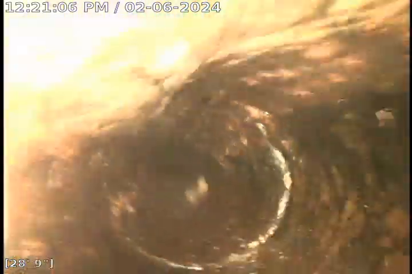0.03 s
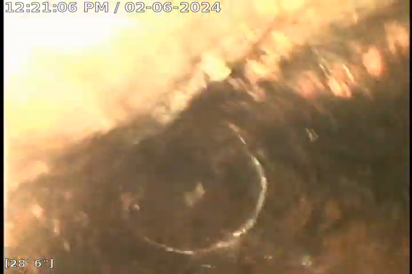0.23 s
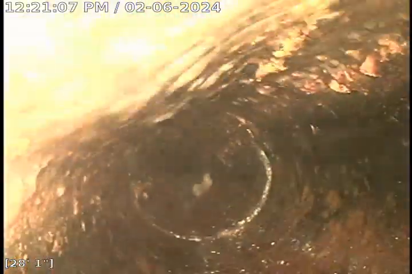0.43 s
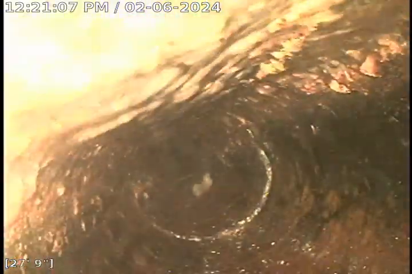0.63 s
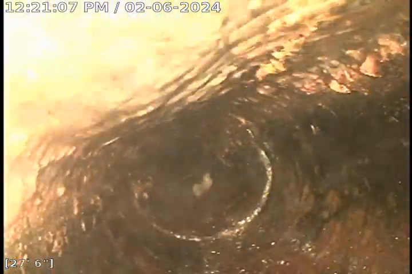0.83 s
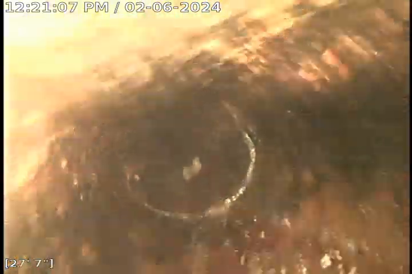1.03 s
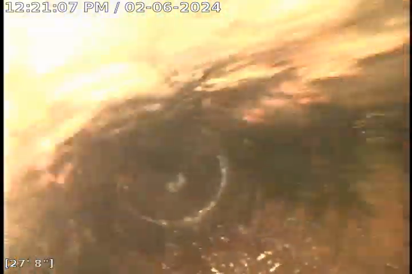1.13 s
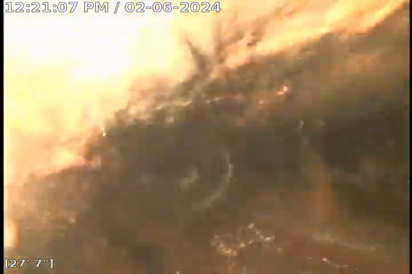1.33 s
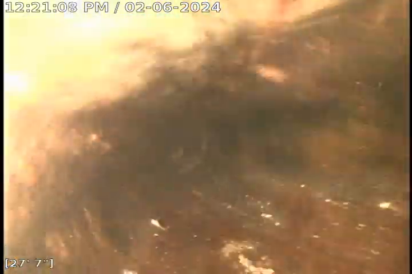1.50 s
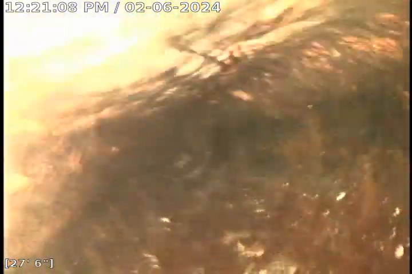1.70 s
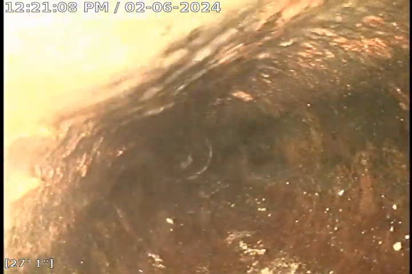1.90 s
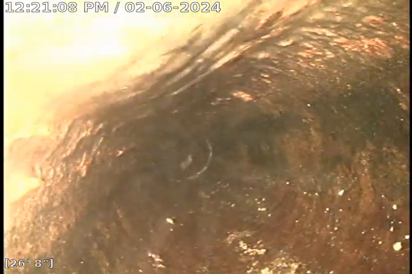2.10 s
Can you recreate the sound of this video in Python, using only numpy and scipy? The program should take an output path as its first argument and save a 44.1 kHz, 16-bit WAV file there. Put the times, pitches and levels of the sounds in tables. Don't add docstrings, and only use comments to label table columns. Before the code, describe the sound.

A stiff cable cracks hard against a drain pipe almost at once, at 0.01 seconds, with a short hollow boom and hard-room tail. Quiet rubbing, tiny squeaks and soft low bumps follow, one clearer near 0.78. A dull rattle and light click come at 1.06-1.12, a short skid into a sharper crack with rebound at 1.45, then faint bumps, scuffing and a weak knock near 2.0, over low hum and hiss.

```python
import sys
import numpy as np
from scipy import signal
from scipy.fft import rfft, irfft, next_fast_len
from scipy.io import wavfile
from scipy.ndimage import uniform_filter1d, map_coordinates

SR = 44100
rng = np.random.default_rng(int(sys.argv[2]) if len(sys.argv) > 2 else 0)


def output_pcm(signal):
    pcm = np.clip(np.atleast_2d(signal).T, -1, 1) * 32767
    wavfile.write(sys.argv[1], SR, np.round(pcm).astype(np.int16))


def convert_level_to_amplitude(level_db):
    exponent = np.asarray(level_db, float) / 20
    return 10 ** exponent


N = 94859

# start in seconds, crack level in dB, clack level in dB, rattle length in seconds,
# top of the crack in Hz.
SNAPS = [
    (0.0143, -3.5, -16.5, 0.0038, 14900),
    (1.057, -35.5, -36.5, 0.0092, 3200),
    (1.1236, -26.5, -31.5, 0.0065, 6800),
    (1.4512, -17.5, -27.5, 0.0018, 12300),
    (1.4575, -29, -34.5, 0.005, 7200),
    (1.491, -40, -35, 0.012, 4370),
    (2.016, -47, -37.5, .01, 3960),
    (1.529, -42, -37.5, 0.02, 2980),
]
# frequency in Hz, level in dB.
CRACK_SPECTRUM = [(1300, -12), (1620, -17.5), (1900, -9), (2400, -9), (3200, -8), (4500, -8), (8000, -12),
                  (15000, -23.5)]
# frequency in Hz, level in dB, T60 in seconds.
RIM_MODES = [(2930, 0, .03), (3430, -1, .035), (4150, -6, .016), (5500, -10, .012)]
# frequency in Hz, width in Hz, level in dB.
WALL_RESONANCES = [(300, 180, -3.5), (435, 133, 2), (702, 130, 3), (910, 150, -3.5), (1032, 134, -0.5),
                   (1270, 67, -22)]
# frequency in Hz, level in dB, T60 in seconds.
PIPE_MODES = [(165, -16, 0.17), (247.4, -5, 0.17), (263.2, -1.5, 0.077), (350, -12, 0.11), (443, -18, 0.2),
              (721, -12.5, 0.081), (922, -18.5, 0.14), (1276, -25, 0.18)]
# start in seconds, end in seconds, end level in dB, rise in dB, top in Hz.
SKIDS = [
    (0.003, 0.015, -28, 14, 2900),
    (1.416, 1.452, -25.5, 20.5, 5300),
    (1.035, 1.058, -38, 19, 4000),
    (1.99, 2.06, -46.5, 1, 1100),
    (1.36, 1.43, -43.5, 13, 960),
]
# start in seconds, level in dB, hold in seconds, pitch in Hz.
TONES = [(.0195, -14, 0.0038, 3435), (.016, -9, .0015, 3050), (.017, -18, 0.0073, 3610),
         (.019, -17.5, 0.011, 665), (0.016, -24.5, 0.013, 1026), (0.016, -23, 0.017, 1362),
         (1.056, -45, .01, 1210), (1.057, -49, 0.009, 2500), (1.1245, -31, 0.011, 692),
         (1.13, -30.5, 0.011, 448), (1.125, -43, 0.0056, 940), (1.126, -38, .004, 3390),
         (1.452, -22.5, 0.00078, 3200), (1.4518, -26, 0.0027, 4600), (1.4525, -26.5, 0.0085, 1113),
         (1.453, -30, .009, 722), (1.4635, -35, 0.0027, 6200), (2.2, -45, .012, 1200),
         (2.5, -47, .015, 690), (.242, -50, .012, 7300), (1.46, -31.5, 0.021, 205),
         (1.434, -35.5, 0.012, 482), (1.545, -39.5, 0.022, 440), (1.505, -45, .02, 1110),
         (1.4, -41, .02, 442), (0.95, -48, .012, 2770)]
# start in seconds, level in dB, push length in seconds, pitch in Hz.
BUMPS = [(0.111, -32.5, 0.042, 263.4), (0.165, -40, 0.03, 256), (0.245, -46.5, 0.023, 414),
         (0.299, -42, 0.027, 270), (0.363, -38, 0.012, 270), (0.389, -38.5, 0.02, 270),
         (.52, -48.5, 0.02, 426), (.6, -47, .02, 190), (0.642, -39, 0.0093, 262), (0.715, -45, 0.058, 270),
         (0.775, -29.5, 0.0041, 211), (0.787, -35.5, 0.023, 267), (0.818, -48, 0.026, 430),
         (1.065, -33.5, 0.021, 273.4), (1.061, -37.5, 0.035, 431), (1.132, -29, 0.014, 324),
         (1.456, -23.5, 0.011, 453), (1.136, -34, 0.026, 174.5), (1.221, -35, 0.018, 257),
         (1.263, -44, 0.025, 187), (1.521, -36.5, 0.031, 432.6), (1.542, -36.5, 0.031, 249),
         (1.619, -45.5, 0.044, 264), (1.721, -41.5, 0.025, 253), (1.771, -42, 0.016, 270),
         (1.824, -48, 0.046, 271), (1.962, -43, 0.011, 280), (1.996, -43, 0.024, 300),
         (2.015, -34.5, 0.012, 320), (2.041, -40, 0.0084, 240), (2.11, -39.5, 0.0096, 238)]
# time in seconds, level in dB, brightness in dB.
DRAG = [(0, -47.5, -17), (.22, -53, 7), (.25, -47, -1.5), (.32, -50.5, 1.5), (0.358, -44.5, 5.5),
        (.55, -48.5, 9), (.6, -51.5, 1), (.72, -51, 9), (0.898, -50.5, 10), (0.942, -61, 7), (1.0, -47, -1),
        (1.15, -48, -3), (1.35, -52.5, 4), (1.5, -54, 6.5), (1.8, -48, -1), (1.87, -46, 9),
        (2.08, -45.5, 6), (2.13, -50, -1)]
# frequency in Hz, density in dB per Hz.
RUB_SPECTRUM = [(290, -55), (500, -19), (603, -4.5), (666, -4), (1250, -2.5), (1370, -7), (3580, -3),
                (13800, -22), (15500, -22)]
# start in seconds, length in seconds, level in dB, start pitch in Hz, end pitch in Hz.
SQUEAKS = [
    (0.227, 0.075, -51.5, 3900, 4360),
    (0.359, 0.042, -50.5, 4200, 4110),
    (0.714, 0.23, -53, 4700, 4500),
    (0.758, 0.15, -53.5, 2090, 2570),
    (0.986, 0.061, -52.5, 2400, 2760),
    (1.838, 0.088, -45.5, 3800, 3510),
]
# frequency in Hz, T60 in seconds.
ROOM_T60 = [(200, 0.46), (1000, 0.47), (4000, 0.25), (12000, 0.2)]
# frequency in Hz, density in dB per Hz.
HISS_SPECTRUM = [(18, -39), (30, -24), (41, -41), (55, -31), (270, -24), (432, 3.5), (518, -10),
                 (5590, -14), (15500, -38)]
# frequency in Hz, width in Hz, level in dB.
AIR_RESONANCES = [(169, 31, -4), (198.4, 18.6, -0.5), (270, 27, 0), (334.4, 35, -7), (422, 44, -6.5),
                  (670, 77, -15.5)]
APART_S = [.02, .045, .235, .275, .53, .675, .99, 1.12, 1.145, 1.445, 1.79, 1.93, 2.09]
CHANNEL_OFFSET = [
    [.0188],
    [.0046],
]

CRACK_RISE_S, CRACK_T60_S, RIM_DB = .0005, .035, 1
CLACK_RISE_S, CLACK_HOLD_S, CLACK_T60_S = .0026, .0092, .053
CLACK_TOP_SHARE = .15
ROOM_CRACK_DB, ROOM_CLACK_DB, ROOM_RISE_S = -9.5, -6.5, .00092
BOOM_DB, BOOM_DELAY_S, BOOM_RISE_S = 2, .0017, .0063
TONE_RISE_CYCLES, TONE_T60_S, TONE_ROUGH_SHARE = 1.5, .03, .3
BUMP_RISE_S, BUMP_T60_S, BUMP_PUFF_DB, BUMP_TOP_HZ = .005, .045, -6.5, 476
GRAINS_PER_S, GRAIN_SPREAD_DB, GRAIN_SHARE, RUB_FLUTTER_DB = 3000, 2.5, .4, .8
SQUEAK_WIDTH_HZ, SQUEAK_EDGE_POWER = 900, .5
HISS_DB, HUM_DB, HUM_FLUTTER_DB = -52.5, -49.5, 1.8
HUM_DB_PER_DRAG_DB = .51
LOW_CUT_HZ, TOP_HZ, SELF_NOISE_DB = 142, 15790, -64
APART_LENGTH_S, APART_DB, APART_CEILING_DB = .022, -5.5, -47
DRIFT_DB, STRAY_DB, STRAY_PATCHY_DB = -62, -68.5, 7


def unit(x):
    return x / np.sqrt(np.mean(x ** 2) + 1e-20)


def along(points, hz):
    f, v = np.transpose(points)
    return np.interp(np.log(hz + 1), np.log(f + 1), v)


def wobble(knots_per_s):
    knots = rng.standard_normal(int(N * knots_per_s / SR) + 4)
    return map_coordinates(knots, [np.arange(N) * knots_per_s / SR])


def filtered(x, response):
    n = x.shape[-1]
    m = next_fast_len(n + 8192)
    return irfft(rfft(x, m) * response(np.fft.rfftfreq(m, 1 / SR)), m)[..., :n]


def noise(n, response):
    return unit(filtered(rng.standard_normal(n), response))


def low_pass(f, top_hz, order=4):
    return 1 / (1 + (f / top_hz) ** order)


def peak(f, centre_hz, width_hz):
    return 1j * f * width_hz / (centre_hz * centre_hz - f * f + 1j * f * width_hz)


def rise(t, length_s):
    return np.clip(t / length_s, 0, 1)


def fade(t, hold_s, t60_s):
    return convert_level_to_amplitude(-60 * np.clip(t - hold_s, 0, None) / t60_s)


def ring(modes, t, t60_scale, scatter_db):
    out = np.zeros(len(t))
    for hz, db, t60_s in modes:
        a, b = rng.standard_normal(2)
        decay = convert_level_to_amplitude(db + scatter_db * a - 60 * t / (t60_scale * min(t60_s, .3)))
        out += decay * np.sin(2 * np.pi * hz * (1 + .0049 * scatter_db * b) * t)
    return out


def add(track, start_s, sound):
    track[round(start_s * SR):][:len(sound)] += sound


def snaps():
    out, t = np.zeros(N + SR), np.arange(SR // 2) / SR
    for s, crack_db, clack_db, length_s, top_hz in SNAPS:
        def sharp(f):
            return convert_level_to_amplitude(along(CRACK_SPECTRUM, f)) * low_pass(f, top_hz)

        def wall(f):
            body = sum(convert_level_to_amplitude(db) * peak(f, c, w) for c, w, db in WALL_RESONANCES)
            return body * low_pass(f, CLACK_TOP_SHARE * top_hz)

        crack = noise(len(t), sharp) * rise(t, CRACK_RISE_S) * fade(t, length_s, CRACK_T60_S)
        crack += convert_level_to_amplitude(RIM_DB) * ring(RIM_MODES, t, .67, 1.3) * rise(t, length_s / 3)
        clack = noise(len(t), wall) * rise(t, CLACK_RISE_S) * fade(t, CLACK_HOLD_S, CLACK_T60_S)
        add(out, s, convert_level_to_amplitude(crack_db - 4.5) * (crack + convert_level_to_amplitude(ROOM_CRACK_DB) * room(sharp)))
        add(out, s, convert_level_to_amplitude(clack_db) * (clack + convert_level_to_amplitude(ROOM_CLACK_DB) * room(wall)))
    return out[:N]


def boom():
    out, t = np.zeros(N + SR), np.arange(SR // 2) / SR
    swell = 1 - np.exp(-t / BOOM_RISE_S)
    add(out, SNAPS[0][0] + BOOM_DELAY_S, convert_level_to_amplitude(BOOM_DB) * ring(PIPE_MODES, t, 1.0, 0) * swell)
    return out[:N]


def skids():
    out, t = np.zeros(N + SR), np.arange(SR // 2) / SR
    for start_s, end_s, db, rise_db, top_hz in SKIDS:
        scrape = noise(len(t), lambda f: f / (f + 250) * low_pass(f, top_hz) / (f + 600) ** .89)
        length_s = end_s - start_s
        swell = convert_level_to_amplitude(db - rise_db * (1 - rise(t, length_s))) * (t < length_s)
        add(out, start_s, swell * scrape)
    return out[:N]


def tones():
    out, t = np.zeros(N + SR), np.arange(SR // 8) / SR
    for s, db, hold_s, hz in TONES:
        rough = 1 + TONE_ROUGH_SHARE * unit(uniform_filter1d(rng.standard_normal(len(t)), size=150))
        shape = rise(t, TONE_RISE_CYCLES / hz) * fade(t, hold_s, TONE_T60_S)
        add(out, s, convert_level_to_amplitude(db) * shape * rough * np.sin(2 * np.pi * hz * t))
    return out[:N]


def bumps():
    out, t = np.zeros(N + SR), np.arange(SR // 4) / SR

    def body(f):
        return sum(peak(f, hz, 85) ** 2 for hz, _, _ in PIPE_MODES) * low_pass(f, BUMP_TOP_HZ, 2)

    for s, db, length_s, hz in BUMPS:
        shape = np.sin(np.pi / 2 * rise(t, BUMP_RISE_S)) ** 2 * fade(t, length_s, BUMP_T60_S)
        puff = convert_level_to_amplitude(BUMP_PUFF_DB) * noise(len(t), body)
        add(out, s, convert_level_to_amplitude(db) * shape * (np.sin(2 * np.pi * hz * t) + puff))
    return out[:N]


def rubbing():
    s, db, bright_db = np.transpose(DRAG)
    t = np.arange(N) / SR
    hits = rng.random(N) < GRAINS_PER_S / SR
    grit = hits * convert_level_to_amplitude(GRAIN_SPREAD_DB * rng.exponential(size=N)) * rng.standard_normal(N)
    source = rng.standard_normal(N) + GRAIN_SHARE * unit(grit)
    rub = unit(filtered(source, lambda f: convert_level_to_amplitude(along(RUB_SPECTRUM, f))))
    top = filtered(rub, lambda f: 1 / (1 + (6500 / (f + 1)) ** 4))
    level = convert_level_to_amplitude(np.interp(t, s, db) + RUB_FLUTTER_DB * wobble(24.5))
    return level * (rub - top + top * convert_level_to_amplitude(np.interp(t, s, bright_db)))


def squeaks():
    out, t = np.zeros(N + SR), np.arange(SR // 4) / SR
    for s, length_s, db, start_hz, end_hz in SQUEAKS:
        u = rise(t, length_s)
        slow = noise(len(t), lambda f: low_pass(f, SQUEAK_WIDTH_HZ / 2, 2))
        carrier = np.sin(2 * np.pi * np.cumsum(start_hz + (end_hz - start_hz) * u) / SR)
        add(out, s, convert_level_to_amplitude(db + 4.5) * np.sin(np.pi * u) ** SQUEAK_EDGE_POWER * slow * carrier)
    return out[:N]


def room(colour):
    n = SR // 2
    hz, t, z = signal.stft(noise(n, colour), SR, nperseg=256)
    decay = convert_level_to_amplitude(-60 * t / along(ROOM_T60, hz)[:, None])
    tail = signal.istft(z * decay, SR, nperseg=256)[1][:n]
    return tail * rise(np.arange(n) / SR, ROOM_RISE_S)


def background():
    s, drag_db, _ = np.transpose(DRAG)
    stir_db = HUM_DB_PER_DRAG_DB * (np.interp(np.arange(N) / SR, s, drag_db) - drag_db.mean())
    hiss = noise(N, lambda f: convert_level_to_amplitude(along(HISS_SPECTRUM, f)))
    hum = noise(N, lambda f: sum(convert_level_to_amplitude(db) * peak(f, c, w + 20) ** 2 for c, w, db in AIR_RESONANCES))
    return convert_level_to_amplitude(HISS_DB) * hiss + convert_level_to_amplitude(HUM_DB + stir_db + HUM_FLUTTER_DB * wobble(11.77)) * hum


def scene():
    contacts = snaps() + boom() + skids() + tones() + bumps()
    mono = contacts + rubbing() + squeaks() + background()
    return np.array([mono, mono])


def microphone(dry):
    def band(f):
        r = f / LOW_CUT_HZ
        return (f < TOP_HZ) * ((1j * r) ** 2 / (1 + 1.1j * r - r ** 2)) ** 2

    self_noise = noise(N, lambda f: (f / (f + 50)) ** 2 * low_pass(f, 110))
    return filtered(dry, band) + convert_level_to_amplitude(SELF_NOISE_DB) * self_noise


def channel_difference(x):
    t = np.arange(N) / SR
    gate = sum(np.cos(np.pi * np.clip((t - s) / (2 * APART_LENGTH_S), -.5, .5)) ** 2 for s in APART_S)
    z = signal.stft(x, nperseg=512)[2]
    ceiling = convert_level_to_amplitude(APART_CEILING_DB)
    size = np.tanh(uniform_filter1d(abs(z), 5, 0) / ceiling) * ceiling
    blur = signal.istft(size * np.exp(2j * np.pi * rng.random(z.shape)), nperseg=512)[1][:N]
    apart = convert_level_to_amplitude(APART_DB) * gate * filtered(blur, lambda f: (f / (f + 3000)) ** .51)
    stray = noise(N, lambda f: (f / (f + 50)) ** 2 * low_pass(f, 250, 2))
    stray = convert_level_to_amplitude(STRAY_DB + STRAY_PATCHY_DB * wobble(14)) * stray
    return apart + convert_level_to_amplitude(DRIFT_DB) * wobble(3.6) + stray


def top_cut(x):
    return signal.sosfilt(signal.butter(12, 15780, fs=SR, output="sos"), x)


def record(dry):
    x = microphone(dry)
    x = x + channel_difference(x[0]) * [[1], [-1]] + np.array(CHANNEL_OFFSET)
    return top_cut(np.clip(x, -1, 1))


dry = scene()
out = record(dry)
output_pcm(out)
```